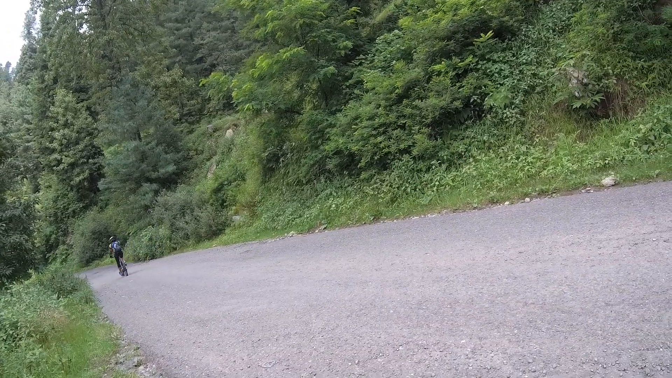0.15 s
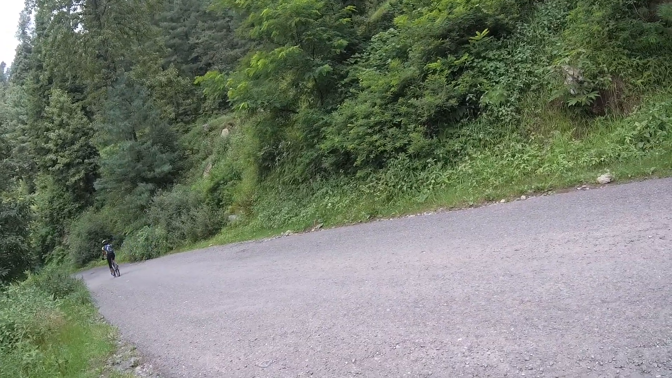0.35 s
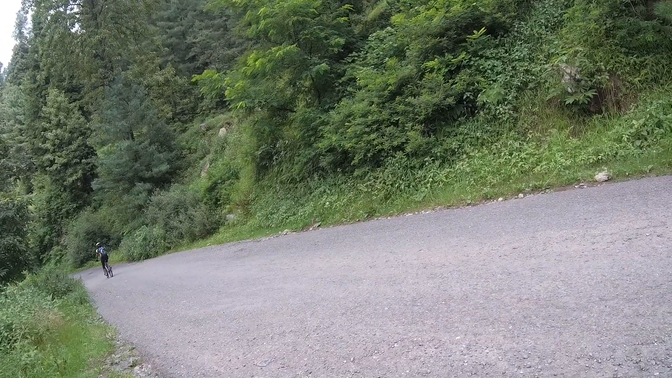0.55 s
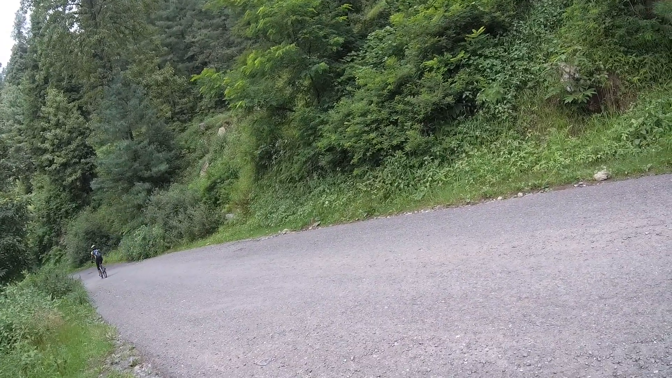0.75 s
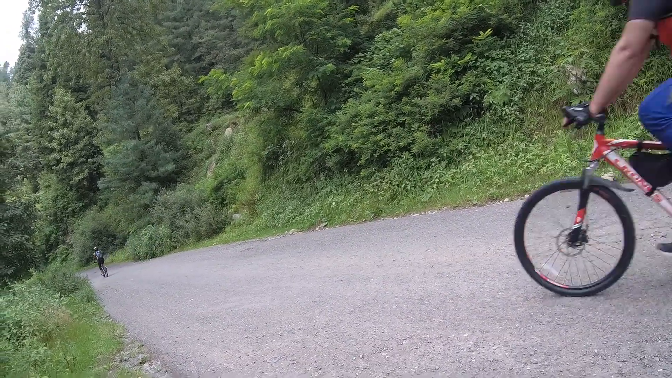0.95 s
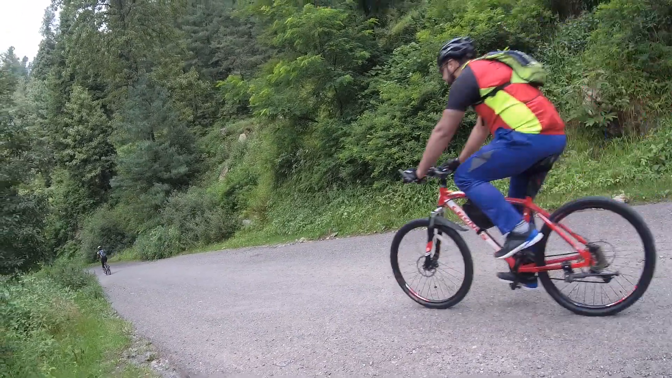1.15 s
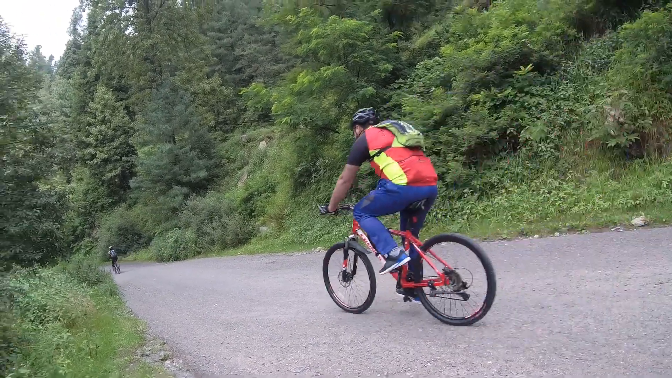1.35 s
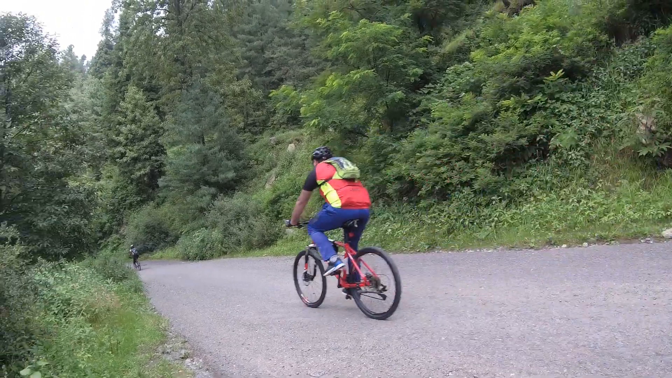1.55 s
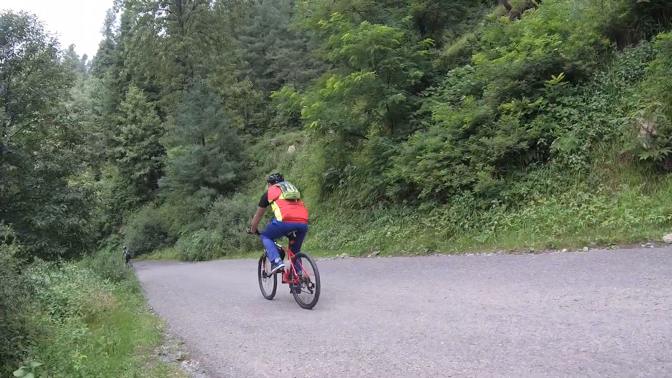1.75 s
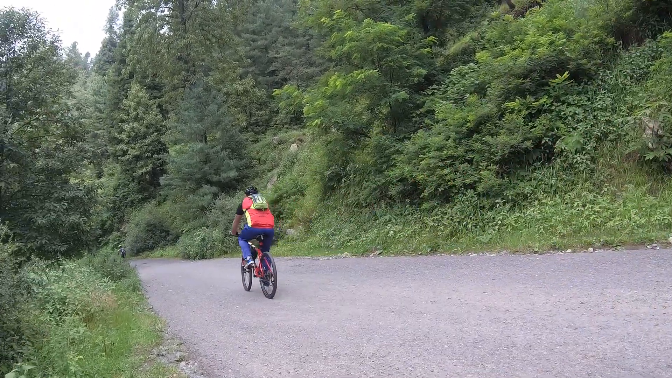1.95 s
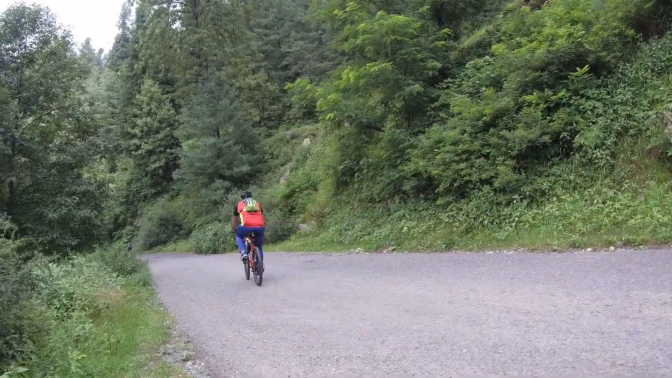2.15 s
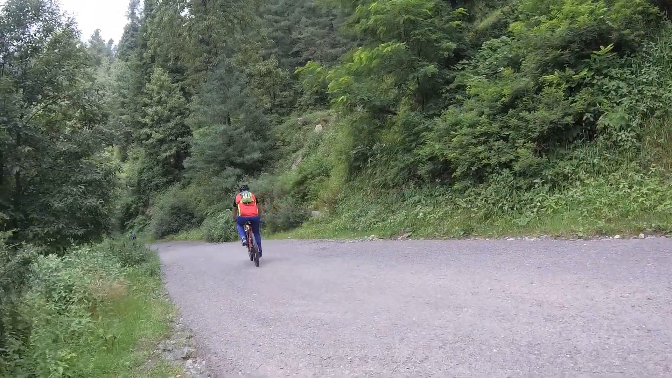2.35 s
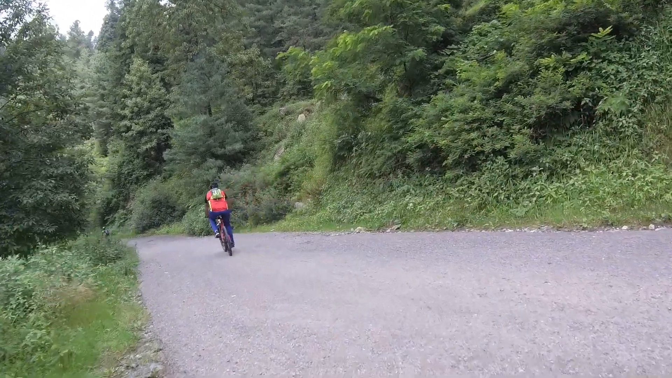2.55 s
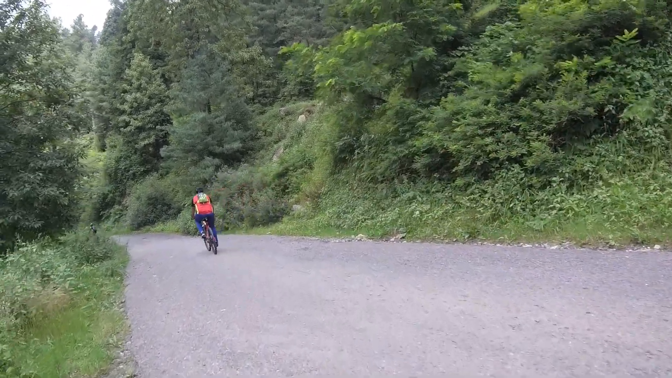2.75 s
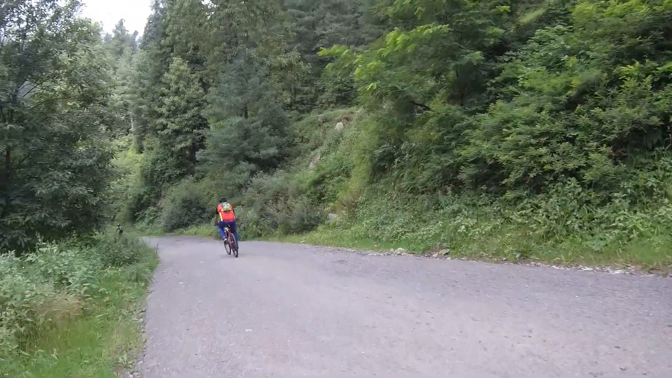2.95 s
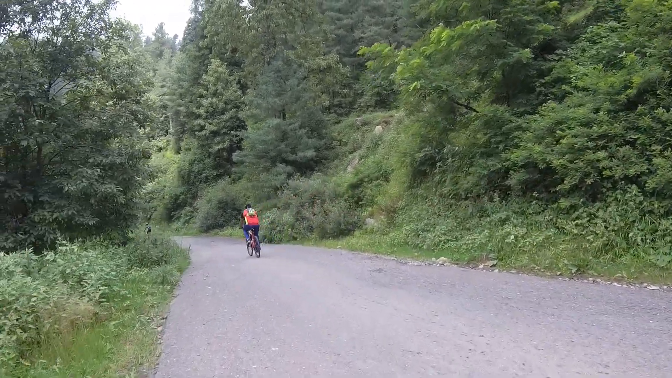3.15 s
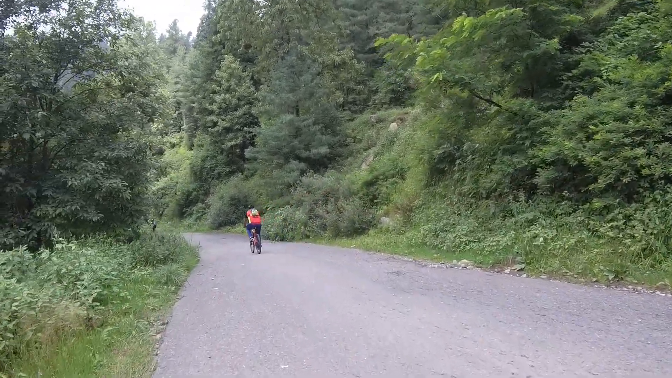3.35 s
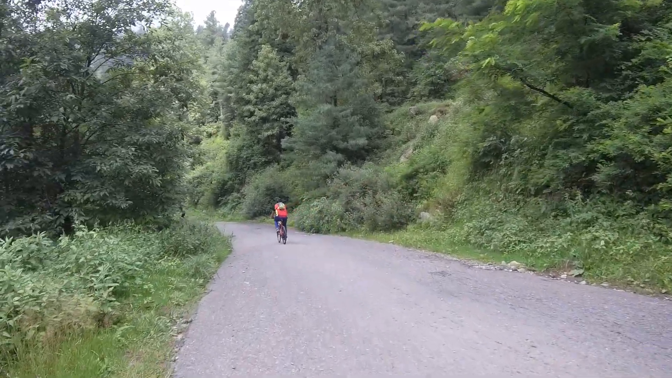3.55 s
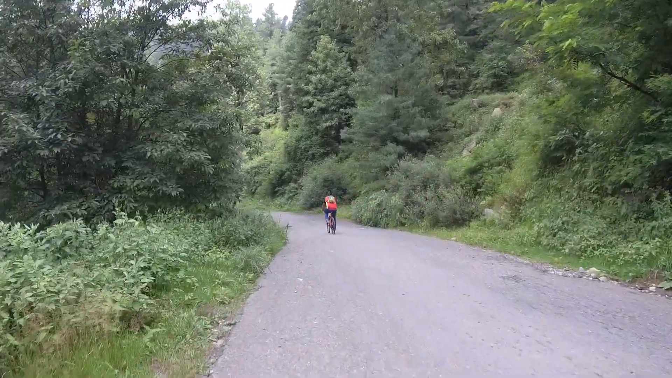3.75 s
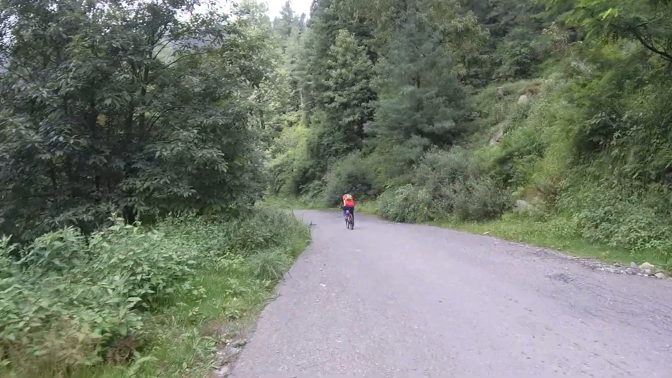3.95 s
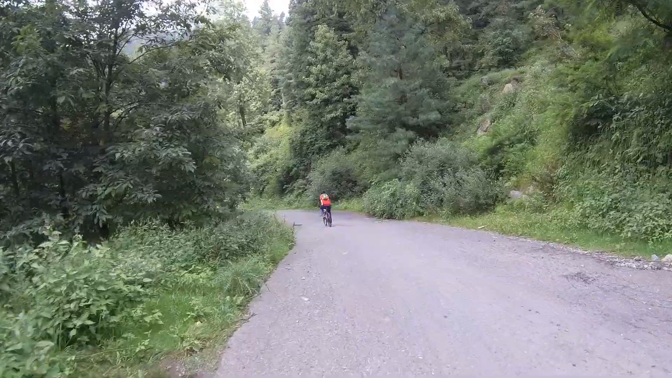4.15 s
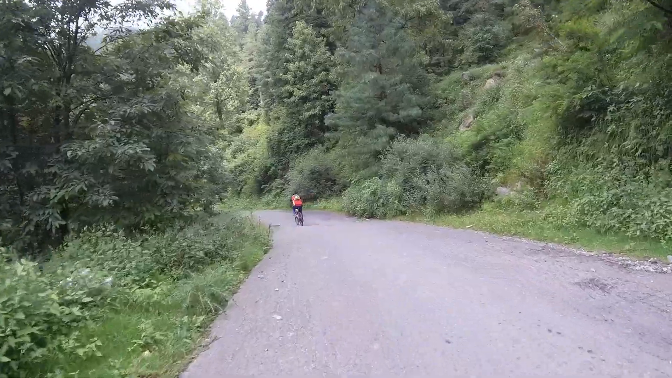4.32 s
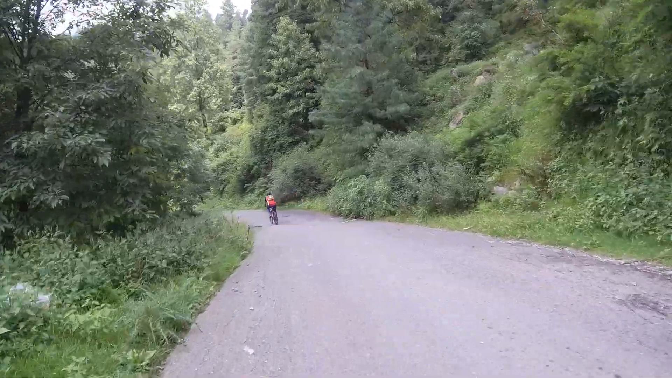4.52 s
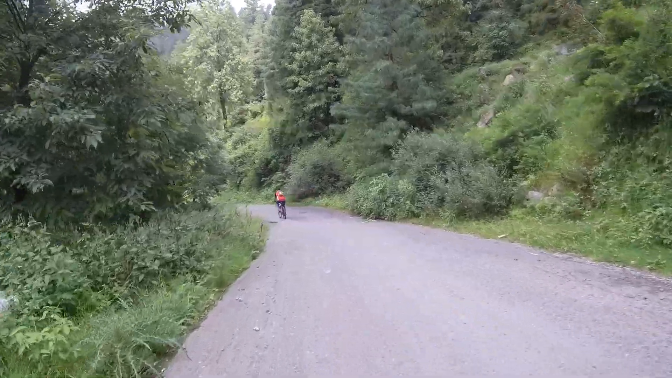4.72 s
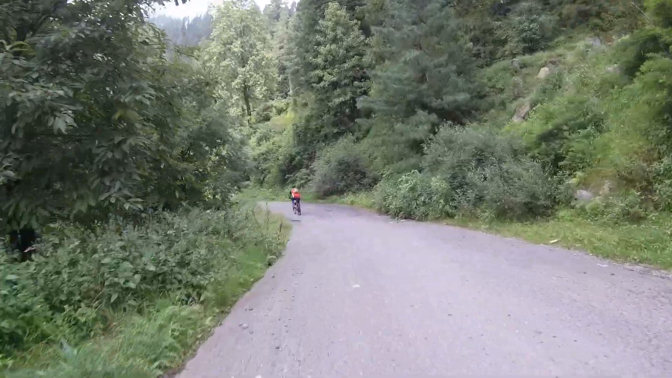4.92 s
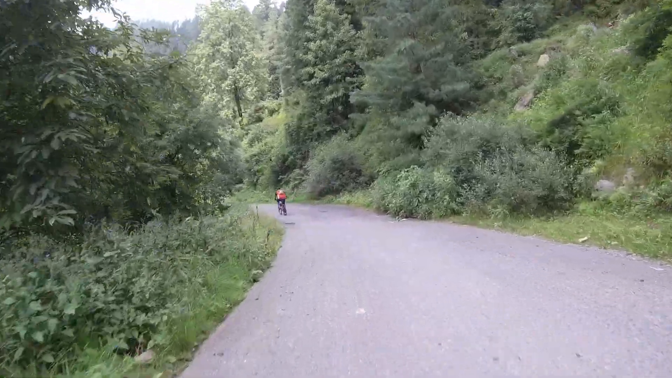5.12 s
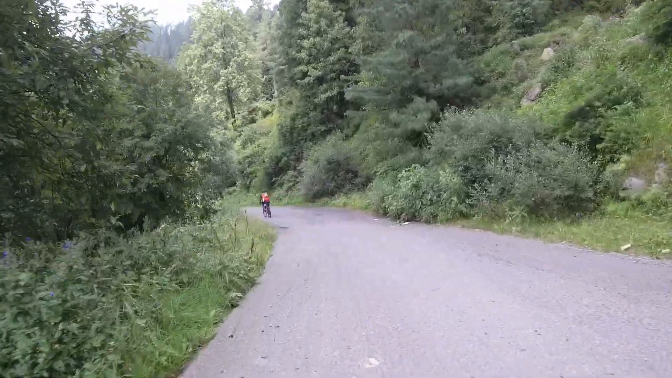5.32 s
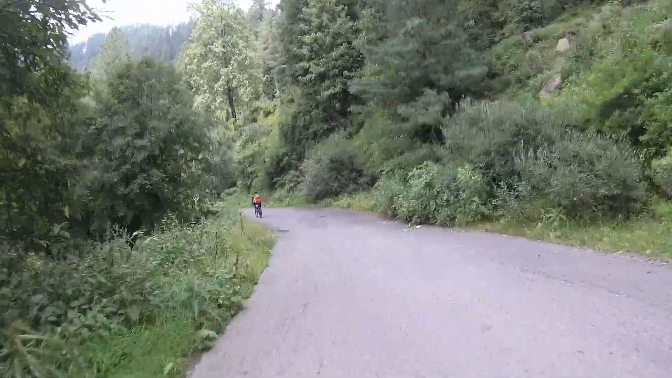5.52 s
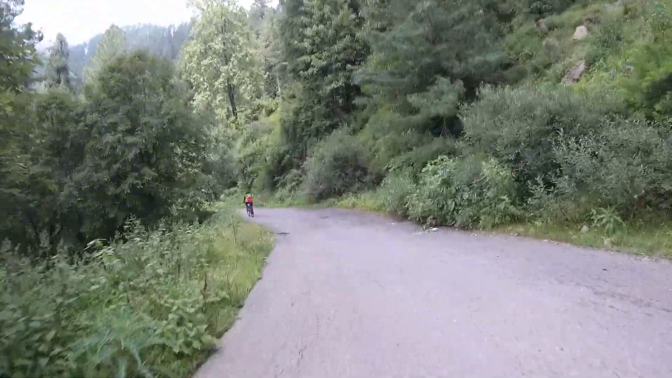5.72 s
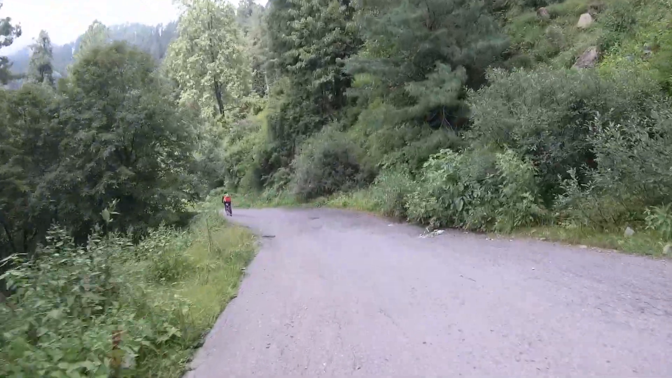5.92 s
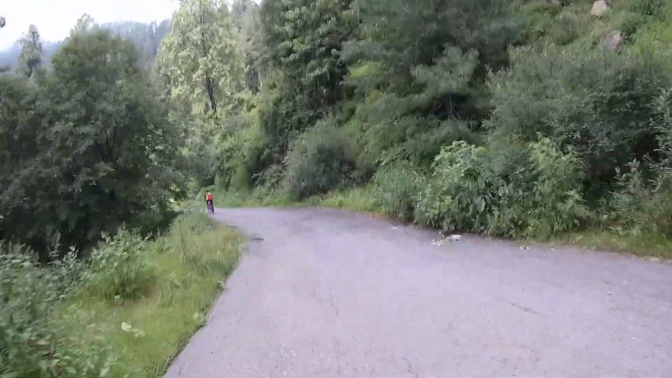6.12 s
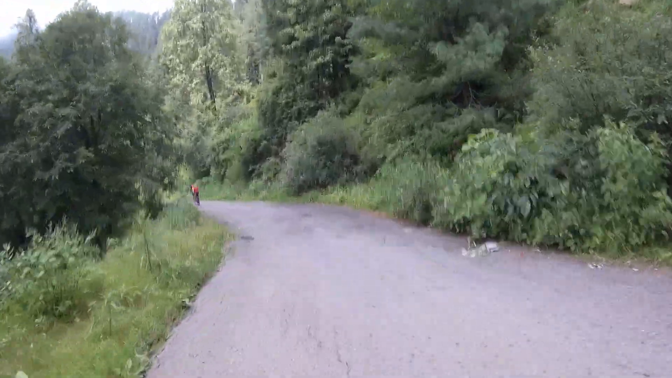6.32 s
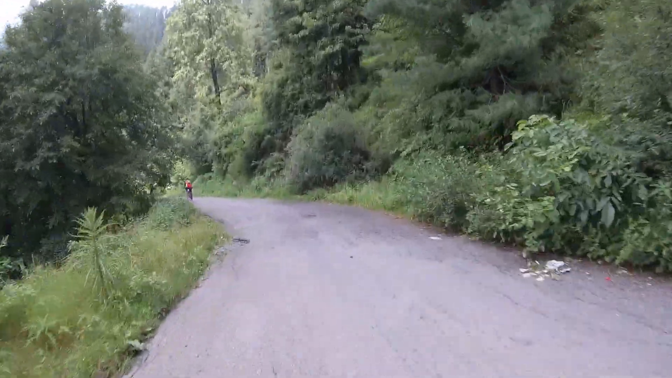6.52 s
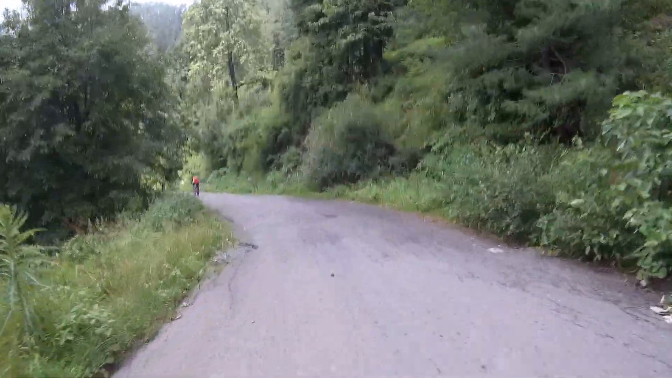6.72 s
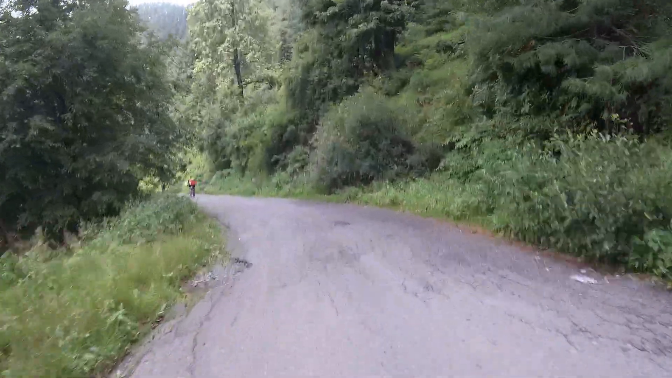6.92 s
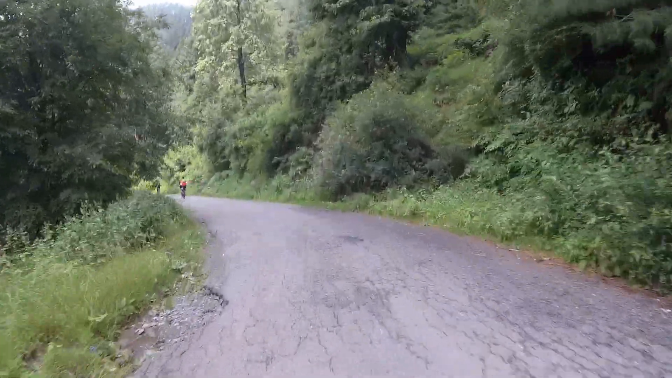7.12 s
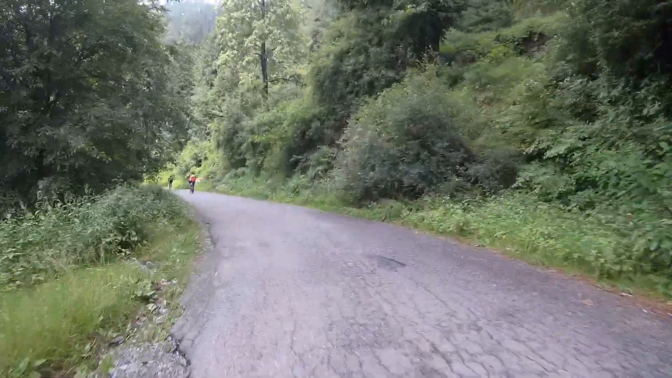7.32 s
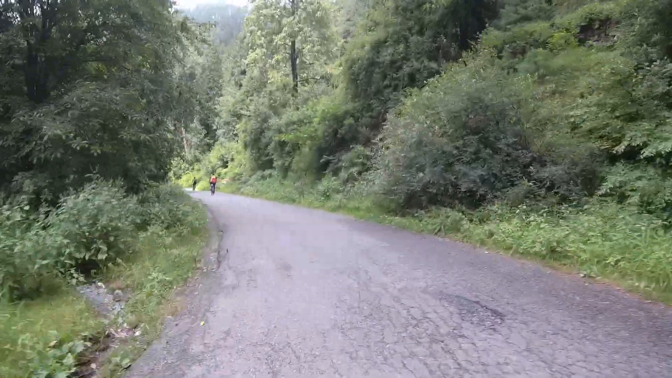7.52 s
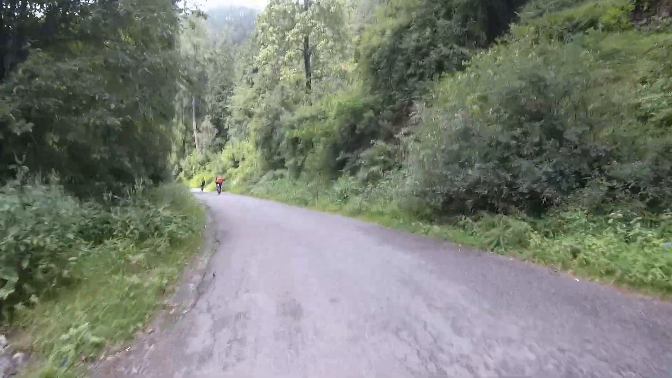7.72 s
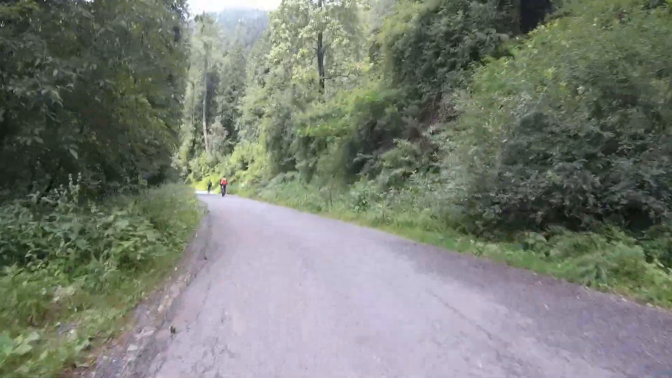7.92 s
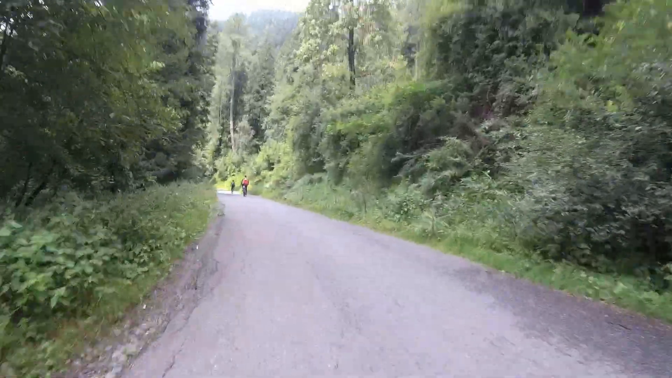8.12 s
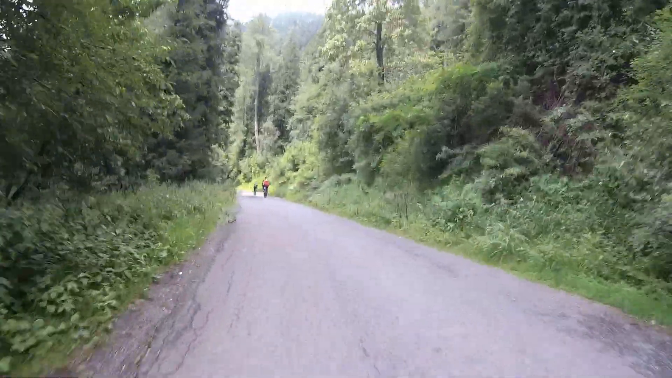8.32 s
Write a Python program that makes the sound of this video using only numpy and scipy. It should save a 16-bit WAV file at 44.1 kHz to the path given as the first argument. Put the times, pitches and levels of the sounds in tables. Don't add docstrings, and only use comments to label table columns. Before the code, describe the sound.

A bicycle sets off downhill: light clicks, pedal clacks, then juddering tyre rumble with wind thuds and loose rattles growing steadily to loud distortion.

```python
import sys
import numpy as np
from scipy import signal
from scipy.fft import rfft, irfft
from scipy.io import wavfile
from scipy.ndimage import uniform_filter1d, minimum_filter1d

SR = 44100
rng = np.random.default_rng(int(sys.argv[2]) if len(sys.argv) > 2 else 0)


def ratio(d):
    e = np.asarray(d, float) / 20
    return 10 ** e


def master_out(mix):
    frames = np.transpose(np.atleast_2d(mix))
    ceiling = np.clip(frames, -1, 1)
    pcm = np.round(ceiling * 32767).astype(np.int16)
    wavfile.write(sys.argv[1], SR, pcm)


N = 369116


def evened(x):
    return x / np.sqrt(np.mean(x ** 2) + 1e-20)


def add(mix, start_s, sound):
    part = mix[round(start_s * SR):][:len(sound)]
    part += sound[:len(part)]


def read(points, hz):
    f, value = np.transpose(points)
    return np.interp(np.log(hz + 1), np.log(f + 1), value)


def ring(x, modes, damping=1, sign=-1):
    out = np.zeros(len(x))
    for k, (hz, width_hz, db) in enumerate(modes):
        radius = np.exp(-np.pi * width_hz * damping / SR)
        angle = 2 * np.pi * hz / SR
        numerator = [2 * (1 - radius) * np.sin(angle)]
        denominator = [1, -2 * radius * np.cos(angle), radius * radius]
        out += sign ** k * ratio(db) * signal.lfilter(numerator, denominator, x)
    return out


def band(x, lo_hz, hi_hz):
    return signal.sosfilt(signal.butter(N=2, Wn=[lo_hz, hi_hz], btype="band", fs=SR, output="sos"), x)


def held(x, span_s, share):
    power = uniform_filter1d(x ** 2, int(span_s * SR))
    return evened(x / (abs(power) + 1e-12) ** (np.clip(share, 0, 1) / 2))


def grit(per_s, spread_db):
    size = ratio(spread_db * np.minimum(rng.exponential(1, N), 5)) * rng.choice([-1., 1.], N)
    return evened(size * (rng.random(N) < per_s / SR))


# [f/Hz, width/Hz, level/dB]
BAR_MODES = [(80, 22, 6), (97.4, 30, -1), (147.2, 9.6, -2)]
BRACKET_MODES = [(808, 170, -6), (981.6, 44, -0.5), (1196, 270, -2.5), (1331, 124, 5), (1437, 260, -2.5)]
HOUSING_MODES = [(1811, 108, 0.5), (2027, 110, -2), (2230, 130, -8.5)]
TICK_MODES = [(3300, 730, -4.5), (4300, 240, 10), (5700, 510, -6.5), (7240, 400, -3), (10500, 780, -18.5),
              (14000, 2500, -22)]


def parts(low, mid, high, frame_modes):
    frame = band(ring(low, frame_modes), 120, 650)
    bar = band(band(ring(low, BAR_MODES), 61, 360), 22, 440)
    bracket = band(ring(mid, BRACKET_MODES), 570, 1275)
    housing = band(ring(high, HOUSING_MODES), 1200, 4000)
    tick = band(ring(high, TICK_MODES), 1800, 14000)
    return frame, bar, bracket, housing, tick


# [f/Hz, width/Hz, level/dB]
FRAME_MODES = [(234, 30.6, -5.5), (265.5, 29, -4.5), (318, 26.9, 2), (391.2, 59.6, -9.5),
               (436.6, 61.3, -9.5), (600.3, 48, -24.5)]
# [t/s, level/dB]
SHAKE = [(0.0, -71), (0.55, -71.5), (0.82, -78), (0.92, -48.5), (1.19, -65.5), (1.35, -54.5), (1.52, -63),
         (1.84, -53), (2.13, -59.5), (2.4, -48.5), (2.53, -35), (2.84, -35.5), (3.1, -32), (3.45, -37),
         (4.3, -30.5), (5.6, -21), (6.8, -15), (8.37, -10)]
# [t/s, level/dB]
WIND = [(0.0, -83), (0.81, -86), (1.0, -56.5), (1.2, -71), (1.52, -81), (1.84, -47.5), (2.2, -72.5),
        (2.4, -48.5), (2.84, -39.5), (3.3, -47.5), (3.52, -39), (4.6, -42.5), (4.93, -36), (5.3, -37.5),
        (5.56, -36), (6.5, -28.5), (7.15, -35), (8.37, -33.5)]
# [t/s, extra shaking level/dB]
SWAYS = [
    (2.3, 7.5),
    (2.56, 4.5),
    (2.66, -1.5),
    (2.99, -1),
    (3.06, -1),
    (3.2, 2.5),
    (3.285, 10.5),
    (3.36, -12),
]
# [t/s, extra shaking level/dB]
PATCHES = [(3.755, 3), (3.811, 5.5), (3.87, 2), (3.92, 7.5), (4.123, 7), (4.171, 9.5), (4.206, 6.5),
           (4.253, 12), (4.298, 6.5), (4.322, 5.5), (4.35, 4.5), (4.382, 3.5), (4.417, 6.0), (4.526, 8),
           (4.574, 4.5), (4.629, 5), (4.664, 8), (4.693, 5.5), (4.856, 7.5), (4.898, 4.0), (4.965, 5),
           (4.99, 7.5), (5.1, 10), (5.216, 8.5), (5.315, 8.5), (5.356, 7), (5.448, 5.5), (5.529, 6.5),
           (5.557, 3), (5.616, 7), (5.657, -2.5), (5.681, 6.0), (5.714, 7.5), (5.75, 4.5), (5.861, -2.5),
           (5.893, 4)]
FAST_PATCHES = [(5.945, 6.5), (6.012, 4), (6.041, 4.5), (6.068, 6.0), (6.128, 6), (6.172, -5), (6.216, 4.5),
                (6.248, 2.5), (6.34, 6.5), (6.422, 6.0), (6.487, 2), (6.579, -3.5), (6.723, 5.5),
                (6.758, 6.0), (6.807, 7), (6.831, 4.5), (6.889, 3.5), (6.93, 1.5), (6.978, -8.5),
                (7.068, 5.5), (7.092, -4.0), (7.144, -0.5), (7.197, -5), (7.26, -4), (7.302, 4.5),
                (7.555, 4.5), (7.579, -6), (7.623, 3), (7.648, 10), (7.669, 4.5), (7.738, 5), (7.927, 5),
                (7.951, 8), (7.998, 6), (8.11, -7.5), (8.141, 5.5), (8.181, 3), (8.328, 5.5), (8.365, -6.5)]


def road():
    rise_s, fall_s = 0.0081, 0.016
    rest_db, patch_share = -74, 0.21
    t = np.arange(N) / SR
    hum_db = np.interp(t, *np.transpose(SHAKE))
    thud_db = np.interp(t, *np.transpose(WIND))
    patch_db = np.zeros(N)
    for s, db in [*SWAYS, *PATCHES, *FAST_PATCHES]:
        near = slice(round((s - .2) * SR), round((s + .3) * SR))
        width_s = np.where(t[near] < s, rise_s, fall_s)
        patch_db[near] += db * np.exp(-((t[near] - s) / width_s) ** 2)

    rise_db = hum_db - rest_db + patch_share * patch_db
    hum_db = hum_db + patch_db
    drone_db = -82 + 0.71 * rise_db
    hiss_db = -84.5 + 0.55 * rise_db

    stones = grit(500, 2.98)
    low = stones + 0.57 * grit(3000, 2.5)
    mid = 0.89 * stones + grit(2500, 3.5)
    high = 1.8 * stones + grit(2500, 2.6)
    shaken = parts(low, mid, high, FRAME_MODES)
    levels = (hum_db, thud_db, drone_db, hiss_db, hiss_db - 28.0)
    spans_s = (0.022, 0.03, 0.18, 0.26, 0.24)
    shares = (.6, 0.38, 0.39, .43, .43)
    return sum(ratio(db) * held(x, span_s, share)
               for x, db, span_s, share in zip(shaken, levels, spans_s, shares))


# [f/Hz, width/Hz, level/dB]
STANDING_MODES = [(244, 22, -15), (311.8, 13, 4.5), (340.8, 26, 4.5), (404, 140, -8), (428, 260, -2),
                  (604, 88, -15.5), (645, 26, -12.5)]


def blow(tap, u, levels_db, contact_s, low_hz):
    push = tap * np.exp(-u / contact_s) * .045
    push[0] = 1
    softened = uniform_filter1d(push, size=36, origin=17)
    frame = band(ring(softened, STANDING_MODES, sign=0.89), low_hz, 760)
    bar = band(ring(push, BAR_MODES), 55, 390)
    bracket = band(ring(push, BRACKET_MODES), 290, 970)
    housing = band(ring(push, HOUSING_MODES), 1300, 2400)
    tick = band(ring(push * np.exp(-u / 0.0044), TICK_MODES), 2600, 15000)
    return sum(ratio(db) * x / abs(x).max() for x, db in zip((frame, bar, bracket, housing, tick), levels_db))


# [t/s, peak level/dB, hardness/dB, contact/ms]
TAPS = [(0.138, -43, -16, 5.3), (0.258, -39.5, -6, 5.9), (0.291, -44, -10, 2.9), (0.429, -58, -19, 7),
        (0.614, -39, -8.5, 7.6), (0.658, -43.5, -11, 7.5), (0.693, -42.5, -12.5, 11),
        (0.728, -44.5, -14, 2.8), (0.772, -40.5, -19, 7.4), (0.807, -43, -12, 7.5), (0.84, -44, -10, 5.1),
        (0.876, -53, -3, 5.2)]
# [t/s, peak level/dB, hardness/dB, contact/ms]
STEPS = [(0.916, -32, -15.5, 11), (0.96, -45, -8, 6.2), (1.011, -29, -7, 4.6), (1.091, -32, -39, 23),
         (1.318, -54, -24, 3.2), (1.512, -22.5, -21.5, 6.9), (1.523, -27, -22, 10), (1.694, -18, -30.5, 25),
         (1.724, -12.5, -25.5, 10.3), (1.73, -14.5, -44, 7.4), (1.754, -30, -31, 6.9),
         (1.793, -36, -12.5, 5.1), (1.874, -39, -22, 24), (1.895, -33.5, -21.5, 12.3),
         (2.09, -45.5, -18, 26)]
# [t/s, peak level/dB, hardness/dB, contact/ms]
PEDALS = [(2.215, -32, -18, 12.6), (2.274, -41, -15, 3), (2.348, -26.5, -14.5, 25),
          (2.461, -32.5, -1.5, 7.6), (2.498, -21.5, -42, 4.6), (2.586, -39, -23, 11),
          (2.725, -4.5, -21.5, 4.9), (2.775, -29.5, -3.5, 9.6), (2.868, -12.5, -28, 2.8),
          (2.913, -11.5, -20, 6.5), (2.938, -13, -22.5, 6), (2.948, -7, -24, 8.2),
          (2.964, -15.5, -10.5, 7.4), (3.023, -23.5, -10, 11), (3.118, -11.5, 2.5, 4.6),
          (3.135, -18.5, -1.5, 3.4), (3.168, -14, -15, 10), (3.206, -29, -15, 15), (3.262, -20.5, -14, 6.6),
          (3.327, -34, -11.5, 4), (3.413, -19, -16, 4.4), (3.453, -26.5, -14, 10)]
# [t/s, peak level/dB, hardness/dB, contact/ms]
PEBBLES = [(3.644, -34.5, -1.5, 4.8), (3.866, -21.5, -15.5, 3.3), (3.909, -18.5, -15, 1.7),
           (4.046, -26, -4.5, 3.3), (4.249, -28, -21, 7.5), (4.438, -35, 0, 4.6), (5.136, -24, -17, 4.7),
           (5.307, -19, -27, 8.1), (5.522, 0, -19, 4.6), (5.676, -13, -43, 6.5), (5.723, -11, -5, 7.6),
           (6.076, -8.5, -21.5, 2.54), (6.103, -11, -16.5, 8.2), (6.127, -20.5, -15, 3.9),
           (6.154, -15, -24, 3), (6.34, -17, -28, 2.3), (6.412, -13, -20, 8.9), (6.479, -4, -19.5, 1.4),
           (6.632, -27, -32, 3), (6.709, 1, -23.5, 3.6), (6.731, -9, -13, 3), (6.806, -7, -16, 3.6),
           (7.067, -7, -17.5, 8.8), (3.965, -24.5, -11.5, 3.5), (3.81, -33.5, -6, 4.2),
           (6.891, -10, -16.5, 4.1), (6.916, -15, -13, 2.4), (6.993, -16.5, -10.5, 3.3)]
# [t/s, peak level/dB, hardness/dB, contact/ms]
BUMPS = [(7.011, -9, -17, 2.6), (7.296, -8.5, -14, 3), (7.417, -8, -23, 16), (7.555, -4, -16.5, 3),
         (7.618, -4.5, -15.5, 4.5), (7.638, -3.5, -16, 5), (7.685, -6, -13, 2.7), (7.75, -10, -19, 7.9),
         (7.858, -5.5, -24.5, 15), (7.928, -4, -30.5, 2.7), (7.95, -7, -13.5, 6.2),
         (7.999, -4.5, -18, 12.8), (8.049, -3.5, -24, 1.7), (8.127, -22.5, -53, 5.9),
         (8.162, -9, -9.5, 2.1), (8.228, -4.5, -15.5, 4.5), (8.329, -2, -27.5, 4.8),
         (7.735, -7, -19.5, 5.5), (7.916, -11, -13, 3.6), (8.081, -11, -16.5, 4.7), (8.141, -12, -14, 4.3),
         (8.307, -8.5, -18.5, 4)]
# [housing under bracket/dB, tick under bracket/dB, low cut-off of the
# frame band f/Hz, frame level/dB]
REACH = [
    (-6, -18, 336, 0.5),
    (-3.5, -18.5, 183, 1.5),
    (-8, -40, 155, -1),
    (-6.5, -37.5, 150, -3),
    (-3, -49.5, 170, -7),
]
# [f/Hz, level/dB, t60/s]
STAY_MODES = [(998, -8.5, 0.067), (1395, -14, 0.05), (2017, -12, 0.045), (434, -24.5, 0.22),
              (445, -28, 0.2), (573, -23, 0.17), (677, -35.5, 0.44), (736, -36, 0.3), (1084, -29, 0.28)]


def knocks():
    out, u = np.zeros(N), np.arange(9000) / SR
    for blows, (housing_db, tick_db, low_hz, frame_db) in zip((TAPS, STEPS, PEDALS, PEBBLES, BUMPS), REACH):
        taps = rng.standard_normal((len(blows), len(u))) ** 3
        for (s, db, hard_db, ms), tap in zip(blows, taps):
            levels_db = (frame_db, -17.0, hard_db, hard_db + housing_db, hard_db + tick_db)
            add(out, s - .0003, ratio(db) * blow(tap, u, levels_db, max(ms, 1) / 1000, low_hz))
    t, clack_s = np.arange(SR // 2) / SR, 3.119
    add(out, clack_s, sum(ratio(db - 60 * t / t60) * np.sin(2 * np.pi * hz * t) for hz, db, t60 in STAY_MODES))
    return out


# [t/s, peak level/dB, pitch f/Hz]
RATTLES = [(2.579, -62, 4300), (2.639, -60, 4250), (3.023, -57.5, 4160), (3.324, -61.5, 3800),
           (3.453, -66, 3900), (3.645, -57, 4170), (3.883, -53.5, 3450), (5.137, -56, 3970),
           (6.108, -47.5, 5400), (5.524, -36, 3820), (6.106, -48, 3630), (6.427, -43, 3700),
           (6.476, -46.5, 3430), (6.638, -43.5, 4400), (6.721, -37, 3260), (6.933, -41.5, 3120),
           (7.065, -42.5, 3280), (7.416, -42.5, 4220), (7.622, -39, 3740), (7.649, -30, 3800),
           (7.645, -30.5, 2950), (7.652, -30.5, 5000), (9.8, -30.5, 3000), (7.955, -29, 6700),
           (7.998, -37, 4500), (9.6, -36, 3500), (4.5, -43, 2200), (6.726, -41.5, 4200), (8.3, -46, 4200),
           (4.5, -54, 4900), (7.75, -42.5, 3200), (7.86, -32.5, 4300), (7.925, -32.5, 3600),
           (7.953, -27, 4400), (7.997, -30.5, 3700), (8.054, -36.5, 3140), (8.139, -35, 3500),
           (8.191, -35, 3330), (8.232, -35, 3100), (8.331, -32, 3550), (7.595, -45.5, 4480),
           (7.762, -42, 4500), (7.878, -38.5, 4500), (8.352, -40.5, 4800), (4.045, -63.5, 3300),
           (7.296, -42, 2800), (6.427, -45, 4500), (7.065, -39, 4500), (8.161, -38.5, 3900),
           (7.686, -40, 3000), (6.805, -40, 2900), (2.78, -61, 4500), (2.71, -52.5, 4800)]
# [t/s, peak level/dB, pitch f/Hz, length/ms]
SNAPS = [(0.927, -49, 6900, 1.8), (1.012, -44.5, 7340, 1.2), (1.093, -54, 6000, 1.7),
         (1.513, -55.5, 4040, 2), (1.524, -49, 6460, 2.6), (1.708, -45, 1970, 6.8), (5.523, -28, 2600, 3),
         (2.727, -37, 4370, 1.6), (2.727, -39, 7600, 1.6), (2.727, -42, 10500, 1.6),
         (2.727, -41, 13200, 1.5), (2.727, -39, 2830, 1.9), (2.94, -47, 2550, 20), (3.1, -32, 1910, 3.3),
         (3.1, -55, 4300, 3), (3.119, -35, 4170, 4.1), (3.119, -26, 3000, 2.5), (3.119, -41, 7000, 2.4),
         (3.119, -41.5, 10500, 2.2), (3.119, -35, 14000, 2), (4.438, -51.5, 4100, 4.4),
         (4.438, -45, 7800, 3), (5.318, -45.5, 4300, 1.5), (5.318, -45, 8000, 1), (5.732, -29, 7660, 1.1),
         (5.732, -39, 4800, 1.4), (5.709, -46, 8100, 1.2), (5.723, -43, 10000, 1.7), (2.461, -63, 7000, 2),
         (1.693, -59, 5930, 2), (5.723, -30, 4470, 2.9), (5.723, -20, 8560, 1.3)]


def rattles():
    rattle_ms = 5.5
    out, u = np.zeros(N), np.arange(3000) / SR
    rows = [(*row, rattle_ms) for row in RATTLES] + list(SNAPS)
    taps = rng.standard_normal((len(rows), len(u))) ** 3
    for (s, db, hz, ms), tap in zip(rows, taps):
        spread = np.clip(.5 / ms, .1, .22)
        edges = (1 - spread) * hz, min((1 + spread) * hz, .45 * SR)
        contacts = tap * np.exp(-u * 1000 / max(ms, 1))
        chatter = band(band(contacts, *edges), *edges)
        add(out, s, ratio(db) * chatter / abs(chatter).max())
    return out


# [f/Hz, width/Hz, level/dB]
PAD_MODES = [(4100, 580, -3.5), (5600, 620, -2.5), (7540, 640, -0.5), (10450, 1500, -8.5)]
# [t/s, level/dB]
RUSTLE = [
    (2.15, -102),
    (2.22, -74.5),
    (2.33, -71),
    (2.38, -62.5),
    (2.42, -76),
    (2.47, -92),
    (2.5, -95),
]


def rustle():
    s, db = np.transpose(RUSTLE)
    level = ratio(np.interp(np.arange(N) / SR, s, db, -130, -130))
    grains = grit(1500, 2.8)
    metal = evened(band(ring(grains, PAD_MODES), 2400, 16000))
    housing = evened(band(ring(grains, HOUSING_MODES), 1500, 2900))
    return level * (metal + ratio(11.5) * housing)


def overload(x):
    ceiling, hardness, corner_hz = .52, 9.5, 250
    flat = x / (1 + abs(x / ceiling) ** hardness) ** (1 / hardness)
    pole = np.exp(-2 * np.pi * corner_hz / SR)
    return band(signal.lfilter([pole, -1], [1, -pole], flat), 42, 20000)


def attacks(x):
    jump_db = 12
    power = band(band(x, 6500, 16000), 6500, 16000) ** 2
    quick, whole = uniform_filter1d(power, size=128), uniform_filter1d(x ** 2, size=2048)
    before = uniform_filter1d(power, size=1024, origin=511)
    sudden = quick[128:] > ratio(2 * jump_db) * abs(before[:-128])
    audible = quick[128:] > ratio(-62) * whole[128:]
    near = -minimum_filter1d(-1. * np.pad(sudden & audible, (128, 0)), size=2400, origin=400)
    return np.clip(uniform_filter1d(near, size=256), 0, 1)


# [f/Hz, level/dB]
MASK = [(1500, -80), (2200, -63.5), (3000, -62), (4500, -64.5), (8000, -53), (16000, -53.5)]


def masked(x, size, lift_db):
    quiet_db, slope = -36.0, .48
    whim_db, smear_db = 2.5, -13
    top_hz, top_sway_hz = 13200, 1456
    hz, _, z = signal.stft(x, SR, window="cosine", nperseg=size)
    power = abs(z) ** 2 + 1e-20
    band_number = np.floor(np.log2(hz + 500) * 7)
    starts, group = np.unique(band_number, return_index=True, return_inverse=True)[1:]
    mean = (np.add.reduceat(power, starts, axis=0) / np.bincount(group)[:, None])[group]
    whole_db = 10 * np.log10(abs(uniform_filter1d(power[hz > 140].sum(0), size=3072 // size)))

    whim = rng.standard_normal((z.shape[1], len(starts))).T[group]
    a, b = rng.standard_normal((*z.shape[::-1], 2)).T
    bar_db = whole_db + slope * np.minimum(whole_db - quiet_db, 0)
    bar_db = bar_db + read(MASK, hz)[:, None] + lift_db + whim_db * whim
    sway = evened(uniform_filter1d(rng.standard_normal(z.shape[1]), size=3))
    edge_hz = top_hz + top_sway_hz * np.maximum(sway, -.5)
    below_edge = (hz[:, None] < edge_hz) | (size < 1000)
    kept = (.5 + .5 * np.tanh((10 * np.log10(mean) - bar_db) / .2)) * below_edge
    smear = ratio(smear_db) * np.sqrt(mean / 2) * (a + 1j * b) * (hz > 2300)[:, None]
    return signal.istft((z + smear) * kept, SR, window="cosine", nperseg=size)[1][:N]


# [f/Hz, level/dB per Hz]
HISS = [(350, -35.5), (600, -7.5), (1530, -19.5), (2180, -16.5), (2650, -4), (12000, -13), (14900, -6.5),
        (16000, -34.5)]


def self_noise():
    floor_db = -82
    white = rfft(rng.standard_normal(N))
    hiss = irfft(white * ratio(read(HISS, np.fft.rfftfreq(N, 1 / SR))), N)
    return ratio(floor_db + 5) * evened(hiss)


def scene():
    return (road() + knocks() + rattles() + rustle())[None]


def roll_off(x):
    return signal.sosfilt(signal.butter(12, 16440, fs=SR, output="sos"), x)


def record(dry):
    hiss = self_noise()
    heard = overload(dry[0]) + hiss
    short = attacks(heard)
    steady = masked(heard, size=1536, lift_db=1.5)
    clicks = masked(heard, size=256, lift_db=1.5)
    mix = (1 - short) * steady + short * clicks
    return roll_off(mix[None])


dry = scene()
out = record(dry)
master_out(out)
```